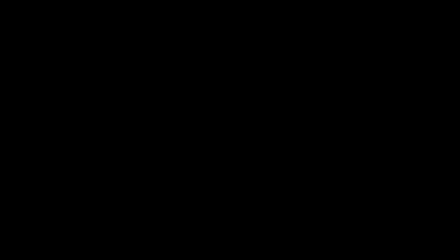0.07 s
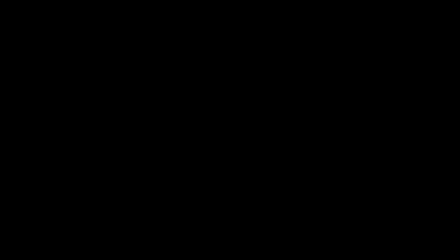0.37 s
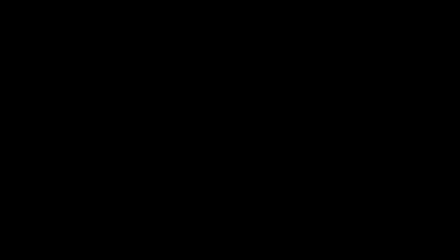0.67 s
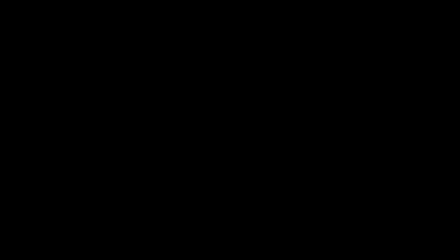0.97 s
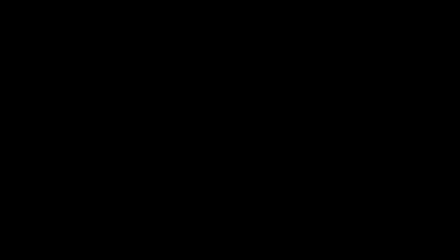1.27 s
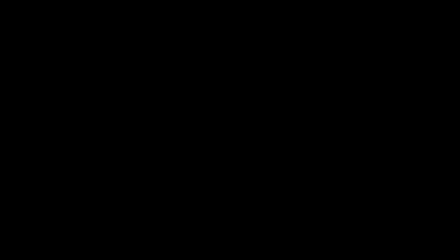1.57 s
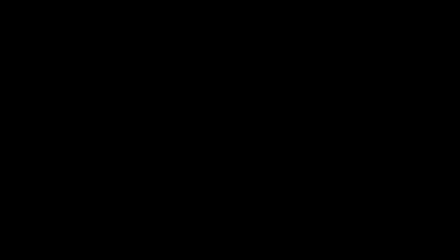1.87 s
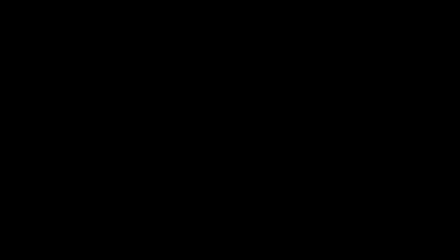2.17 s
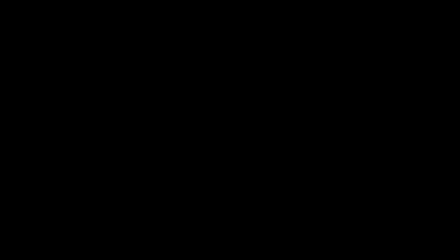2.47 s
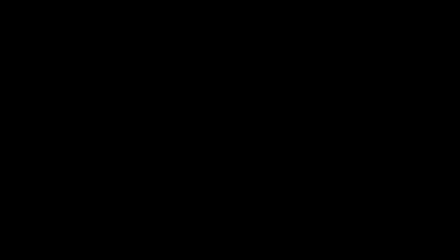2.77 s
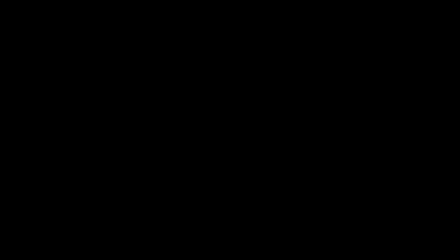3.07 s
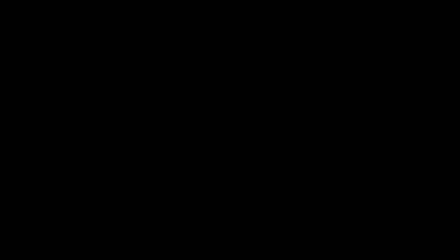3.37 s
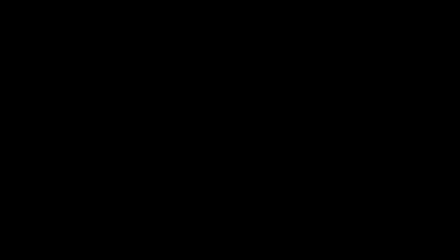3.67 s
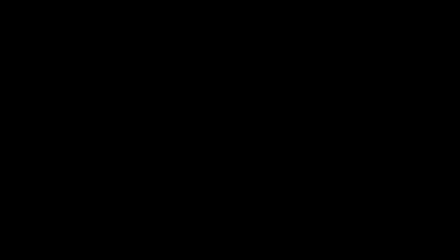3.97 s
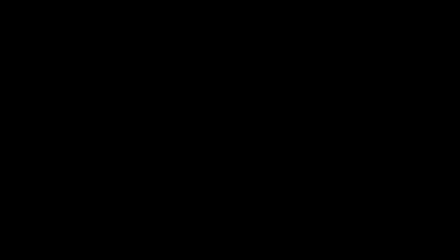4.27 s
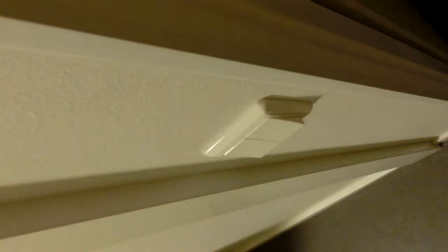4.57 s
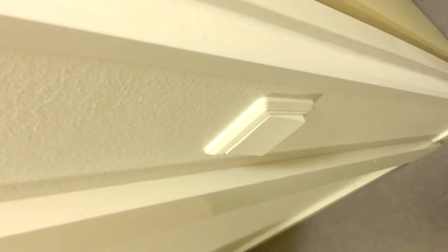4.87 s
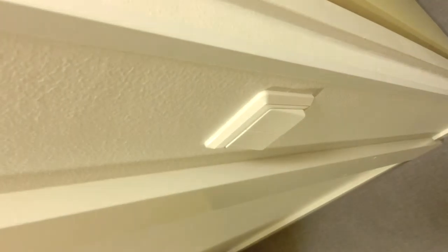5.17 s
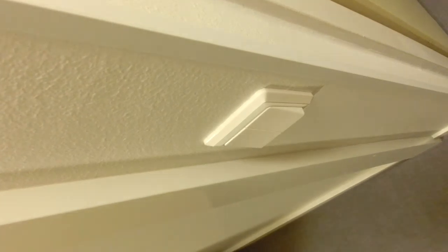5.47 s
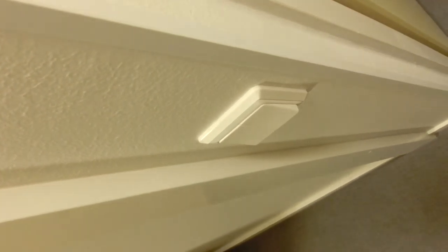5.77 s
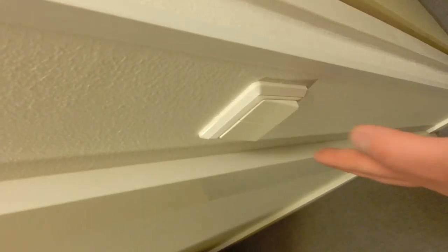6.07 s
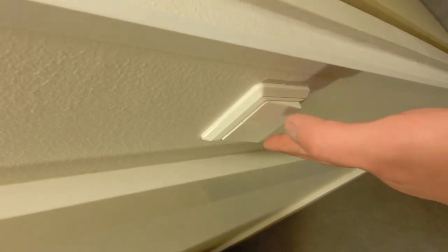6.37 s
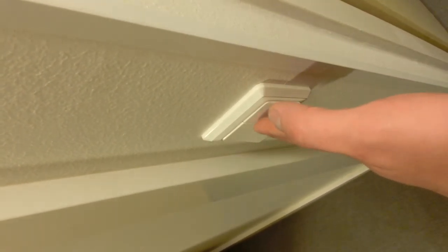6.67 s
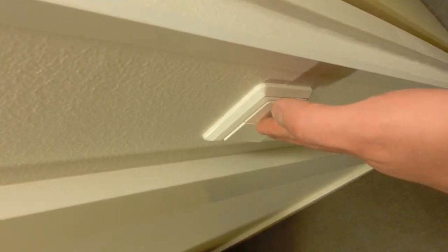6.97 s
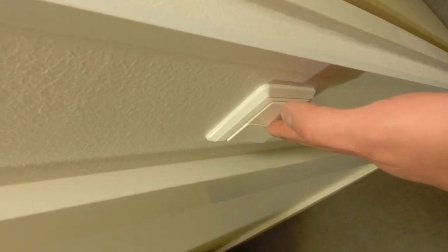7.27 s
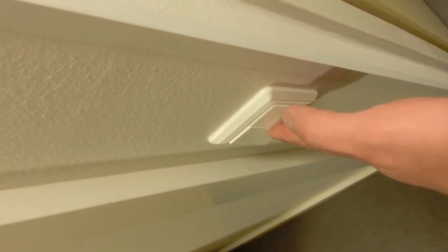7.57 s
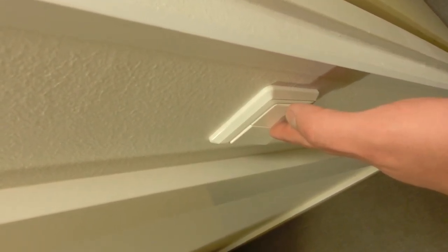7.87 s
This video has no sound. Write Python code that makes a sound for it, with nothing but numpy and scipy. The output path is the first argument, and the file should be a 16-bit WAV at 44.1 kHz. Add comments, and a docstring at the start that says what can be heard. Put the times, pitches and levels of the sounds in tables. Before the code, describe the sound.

A single crisp snap of a light switch, very close to the microphone, stands out in a small room with a short echo. Before it there is only low house rumble, steady hiss and a light tick of a finger on the switch. After it the background drops and creeps back up, while cloth and skin brush faintly. A barely audible high whine comes and goes.

```python
"""Low hum, house rumble and microphone hiss in a small quiet room, with a few dry ticks and the soft
friction of skin and sleeve. A finger takes up a wall switch's slack; a faint electronic whine comes and
goes. At 3.5 s the switch flips close to the microphones: the rocker lets go and lands 2.5 ms later,
the contacts bounce, and wall and room ring on. The click pushes the recorder's gain down,
and the hiss creeps back over three seconds."""
import sys
import numpy as np
from scipy import signal
from scipy.fft import rfft, irfft
from scipy.io import wavfile
from scipy.ndimage import minimum_filter1d

SR = 44100
rng = np.random.default_rng(int(sys.argv[2]) if len(sys.argv) > 2 else 0)


def store_pcm(level_fs):
    """Save levels as 16-bit WAV."""
    pcm = np.round(np.clip(level_fs, -1, 1) * 32767).astype(np.int16)
    wavfile.write(sys.argv[1], SR, np.atleast_2d(pcm).T)


N = 357651
TIME = np.arange(N) / SR
RELEASE_S, LANDING_S = 3.5112, 3.5137


def from_db(db):
    """Decibels to gain."""
    return 10 ** (np.asarray(db) / 20)


def at_hz(points, hz, column=1):
    """Read one column of a table on a log-frequency axis."""
    points = np.array(points)
    return np.interp(np.log(hz + 1e-9), np.log(points[:, 0]), points[:, column])


def pan(left_db):
    """Gains of the two microphones for a left-minus-right level."""
    return from_db(np.array([[left_db], [-left_db]]) / 2)


def impulses(blows):
    """One impulse for each (time [s], level [dB])."""
    out = np.full(N, 1e-18)
    for s, db in blows:
        out[round(s * SR)] += from_db(db)
    return out


def resonate(x, hz, width_hz):
    """A resonance passed twice, so that it swells briefly before it dies; gain 1 at its peak."""
    r = np.exp(-np.pi * width_hz / SR)
    gain = (1 - r * r) / 2
    section = [gain, 0, -gain, 1, -2 * r * np.cos(2 * np.pi * hz / SR), r * r]
    return signal.sosfilt([section, section], x)


def strike(blows, modes):
    """Blows ring parallel resonances of alternating sign."""
    force = impulses(blows)
    return sum((-1) ** k * from_db(db) * resonate(force, hz, width)
               for k, (hz, width, db) in enumerate(modes))


def noise(spectrum):
    """Steady noise with the given spectral density."""
    gain = from_db(at_hz(spectrum, np.fft.rfftfreq(N, 1 / SR))) * np.sqrt(SR / 2)
    return irfft(rfft(rng.standard_normal(N)) * gain, N)


def stroke(start_s, length_s, resonances, rise_share, treble_fade=.32):
    """Friction noise in a few resonances; it swells quickly and fades more slowly, the treble first."""
    rise_s = length_s * rise_share
    past_peak = TIME - start_s - rise_s
    lowest_hz, out = resonances[0][0], 0
    for hz, width, db in resonances:
        fall_s = (length_s - rise_s) * (lowest_hz / hz) ** treble_fade
        swell = np.exp(-(past_peak / np.where(past_peak < 0, rise_s, fall_s)) ** 2)
        friction = resonate(rng.standard_normal(N), hz, width)
        out = out + from_db(db) * swell * friction / friction.std()
    return out


def house_hum(waver_hz=.6):
    """A distant motor hums, slightly unsteady, over the low rumble of the house."""
    # rumble of the house: (frequency [Hz], density [dB per Hz])
    rumble = [(15, -85), (35, -87.5), (62, -83.5), (95, -91.5), (150, -90), (300, -93.5), (540, -93.5),
              (740, -98.5), (1000, -103), (1400, -112), (2400, -112), (4500, -128)]
    # tones of the motor: (frequency [Hz], level [dB])
    hum = [(49.1, -63.5), (733, -81.5), (1060, -87.5)]
    out = noise(rumble)
    for hz, db in hum:
        waver = np.interp(TIME, np.linspace(0, TIME[-1], 40), rng.normal(0, waver_hz, 40))
        out = out + from_db(db) * np.sqrt(2) * np.sin(2 * np.pi * np.cumsum(hz + waver) / SR)
    return out


def microphone_hiss():
    """Each microphone of the pair adds its own steady noise."""
    # noise floor: (frequency [Hz], density [dB per Hz])
    hiss = [(12, -76.5), (30, -87), (120, -87.5), (250, -91.5), (500, -96), (1000, -100), (2000, -103),
            (4000, -105.5), (8000, -107), (14300, -107), (15600, -111)]
    return np.array([noise(hiss), noise(hiss)])


def skin_squeaks():
    """Skin squeaks faintly as the grip shifts."""
    # shifts of the grip: (time [s], length [s], pitch [Hz], level [dB])
    squeaks = [(0.373, 0.013, 2850, -68.5), (1.08, .15, 2480, -76), (1.42, .09, 2660, -75.5),
               (4.781, .14, 2760, -60)]
    # partials and the friction under them: (frequency [multiple of pitch], width [Hz], level [dB])
    skin = [(1, 330, 0.5), (3.38, 1200, -3.5), (2.3, 9500, -6)]
    out = 0
    for s, length, hz, db in squeaks:
        partials = [(hz * multiple, width, partial_db) for multiple, width, partial_db in skin]
        out = out + from_db(db) * stroke(s, length, partials, rise_share=.11)
    return out


def casing_ticks():
    """Tiny dry ticks ring the casing, right at the microphone."""
    # ticks: (time [s], level [dB])
    ticks = [(.414, -24), (3.957, -34), (5.397, -25), (7.232, -28.5)]
    # resonances of the casing: (frequency [Hz], width [Hz], level [dB])
    casing = [(7200, 1500, -4.5), (9200, 1500, -10), (11200, 1160, 1.5), (13500, 2500, -12)]
    return strike(ticks, casing)


def finger_touch():
    """A finger takes up the slack of the rocker with a light double tick."""
    # taps: (time [s], level [dB])
    touches = [(1.2961, -10.5), (1.29752, -11)]
    # resonances of the slack rocker: (frequency [Hz], width [Hz], level [dB])
    slack = [(850, 360, -8.5), (2550, 250, -13), (3700, 420, -1), (4454, 220, 1.5), (5050, 780, -5),
             (7160, 300, -0.5), (8630, 280, -0.5), (10220, 450, 3.5), (12200, 400, -11), (14400, 900, -12)]
    return strike(touches, slack)


def whine(pulse_hz=7900, pulse_db=-75, every_s=.066, pulse_s=.03, edge_s=.008):
    """Faint high tones of the electronics switch on and off, held or pulsing."""
    # held tones: (time [s], length [s], frequency [Hz], level [dB])
    whines = [(2.10, .34, 7430, -83), (4.54, .27, 7430, -81), (5.549, .69, 7424, -83),
              (6.369, .27, 7572, -75)]
    # spells of steady pulsing: (time [s], length [s])
    pulsings = [(2.535, .56), (3.195, .1), (3.395, .035)]
    gate = lambda age, length: np.clip(np.minimum(age, length - age) / edge_s, 0, 1)
    tone = lambda hz, db: from_db(db) * np.sqrt(2) * np.sin(2 * np.pi * hz * TIME)
    held = sum(gate(TIME - s, length) * tone(hz, db) for s, length, hz, db in whines)
    pulses = sum(gate(TIME - s, length) * gate((TIME - s) % every_s, pulse_s) for s, length in pulsings)
    return held + pulses * tone(pulse_hz, pulse_db)


def disperse(x, stiffness=.45, stages=10):
    """In a stiff plate high bending waves run ahead of low ones, which smears each blow."""
    allpass = [-stiffness, 1, 0, 1, -stiffness, 0]
    return signal.sosfilt([allpass] * stages, x)


def rocker(creep_s=.0028, creep_db=-46, thud_db=9.5, thud_hz=170):
    """The rocker creeps, snaps over its spring and lands; each blow rings the plate in its own way."""
    # rocker and cover plate: (frequency [Hz], width [Hz], release level [dB], landing level [dB])
    plate = [(409.6, 170, 7.5, 19.5), (620, 300, 10, 13.5), (904, 400, 7, 19.5), (1250, 400, -4, 5.5),
             (1740, 600, 4.5, 7), (2570, 460, 25, 19.5), (3460, 350, 18.5, 15.5), (3950, 500, 10, 22.5),
             (4700, 650, 22, 23), (5682, 750, 27, 27), (6650, 800, 24, 28), (7630, 600, 17, 16),
             (8230, 600, 20.5, 15), (9120, 650, 23, 33.5), (9850, 650, 26, 15.5), (10950, 700, 22.5, 25.5),
             (11700, 700, 28.5, 13), (12400, 490, 16, 24.5), (12850, 600, 27.5, 19.5),
             (13800, 700, 14, 17.5), (14650, 670, 21, 23)]
    release_modes = [(hz, width, db) for hz, width, db, _ in plate]
    landing_modes = [(hz, width, db) for hz, width, _, db in plate]
    release = strike([(RELEASE_S - creep_s, creep_db), (RELEASE_S, 0)], release_modes)
    landing = strike([(LANDING_S, 0)], landing_modes)
    lowpass = signal.butter(2, thud_hz, fs=SR, output="sos")
    thud = signal.sosfilt(lowpass, impulses([(RELEASE_S, thud_db)]))
    return disperse(release) + thud, disperse(landing)


def contact_chatter(blow_db=-8.0, fall_s=.0022, low_hz=1500):
    """The contacts bounce after each blow: a dense bright crackle, different at each microphone."""
    blows = impulses([(RELEASE_S, blow_db), (LANDING_S, blow_db)])
    envelope = signal.lfilter([1], [1, -np.exp(-1 / (fall_s * SR))], blows)
    highpass = signal.butter(2, low_hz, "high", fs=SR, output="sos")
    return signal.sosfilt(highpass, envelope * rng.standard_normal((2, N)))


def wall_ring():
    """The landing leaves the hollow wall and the spring ringing."""
    # their long rings: (frequency [Hz], level [dB], time to fall 60 dB [s])
    rings = [(415, -30, .5), (610, -35, 0.39), (745, -35, .3), (926, -35.5, .35), (1188, -38, 0.73),
             (1326, -38, .4), (2361, -40, .6), (2512, -32.5, .35), (2705, -32, .25), (3289, -39, .3),
             (5900, -27, .13), (6540, -33, .3), (9000, -28.5, 0.21), (8983, -28, .19), (9300, -24.5, .1),
             (11040, -30, .1), (12229, -29, .13)]
    age = np.maximum(TIME - LANDING_S, 0)
    return sum(from_db(db - 60 * age / t60) * np.sin(2 * np.pi * hz * age) for hz, db, t60 in rings)


def sleeve_swishes():
    """A sleeve swishes past, each move one stroke of bright friction."""
    # moves of the sleeve: (time [s], length [s], level [dB])
    swishes = [(4.311, .12, -74), (4.606, .115, -63)]
    # noise bands of the cloth: (frequency [Hz], width [Hz], level [dB])
    cloth = [(3850, 4200, -1), (12800, 7000, -2)]
    return sum(from_db(db) * stroke(s, length, cloth, rise_share=.39) for s, length, db in swishes)


def hand_rub():
    """The hand rubs dully as it reaches out."""
    # move of the hand: (time [s], length [s], level [dB])
    rubs = [(6.172, .13, -64)]
    # the palm's soft bump and its friction: (frequency [Hz], width [Hz], level [dB])
    palm = [(377, 240, -2), (1800, 1600, -0.5)]
    return sum(from_db(db) * stroke(s, length, palm, rise_share=.13) for s, length, db in rubs)


def room_echo(x, early_db=5.0, early_t60=.089, gap_s=.003):
    """Dense early reflections off the near walls, then a tail that dies faster in the treble."""
    # the small room: (frequency [Hz], level [dB], time to fall 60 dB [s], left-right likeness [0-1])
    room = [(100, -5.5, .4, .8), (380, -1.5, .55, .97), (650, 1.5, 0.52, 1), (1120, 2.5, 0.57, 0.95),
            (1800, -5, .55, 0.9), (2600, -9, .52, .9), (4000, -11.5, 0.51, .75), (6200, -17, 0.45, 0.61),
            (8000, -15.5, 0.4, 0.5), (9500, -17, 0.38, 0.7), (12000, -16.5, .29, .1),
            (15500, -16, .25, 0.0075)]
    t, response = TIME[:SR], 0
    edges_hz = np.geomspace(70, 17000, 25)
    for low, high in zip(edges_hz, edges_hz[1:]):
        hz = np.sqrt(low * high)
        band = signal.butter(2, [low, high], "band", fs=SR, output="sos")
        mid, side = signal.sosfilt(band, rng.standard_normal((2, 2 * SR)))[:, SR:]
        db, t60, alike = (at_hz(room, hz, column) for column in (1, 2, 3))
        fade = from_db(-60 * t / t60) + from_db(early_db - 60 * t / early_t60)
        onset = np.clip(t / gap_s - 1, 0, 1)
        pair = (np.sqrt(1 + alike) * mid + np.sqrt(1 - alike) * side * [[1], [-1]]) * fade * onset
        share = (high - low) / (SR / 2)  # a band carries energy in proportion to its width
        response = response + from_db(db) * np.sqrt(2 * share) * pair / np.linalg.norm(pair)
    return signal.fftconvolve(x[None], response, axes=1)[:, :N]


def gain_control(x, threshold_db=-9.0, range_db=10.5, recover_db_per_s=3.5):
    """A loud peak turns the recorder's gain down at once; it comes back slowly."""
    peak = -minimum_filter1d(-np.abs(x).max(axis=0), size=89)  # highest within 2 ms
    over_db = np.clip(20 * np.log10(peak + 1e-9) - threshold_db, 0, range_db)
    recovery_db = recover_db_per_s * TIME
    cut_db = np.maximum.accumulate(over_db + recovery_db) - recovery_db
    return x * from_db(-cut_db)


def scene():
    """Switch and hand close by, a little right of centre, over the room tone."""
    release, landing = rocker()
    crackle, touch = contact_chatter(), finger_touch()
    brushes = sleeve_swishes() + hand_rub() + skin_squeaks()
    blows = release * pan(left_db=-4.5) + landing * pan(left_db=-3.0)
    click = from_db(1.0) * blows + from_db(-3.5) * crackle * pan(left_db=-2.0)
    soft_sounds = from_db(-3.5) * wall_ring() + touch + brushes
    # under the finger, mostly the middle band of the light touch spreads into the room
    shaded_touch = resonate(touch, hz=4900, width_hz=4000)
    echo = room_echo(release + landing + crackle[0] + from_db(10) * shaded_touch + from_db(3) * brushes)
    hiss = microphone_hiss() * pan(left_db=-.75)
    background = house_hum() + whine() + from_db(-1.0) * casing_ticks()
    return click + hiss + (soft_sounds + echo + background) * pan(left_db=-2.5)


def record(dry, open_s=.125, ceiling=.7, cutoff_hz=15800):
    """The recorder's input opens after a moment; gain control, flattened peaks and a steep top cut."""
    opened = np.clip((TIME - open_s) / .006, 0, 1)
    limited = np.clip(gain_control(dry * opened), -ceiling, ceiling)
    return signal.sosfilt(signal.ellip(12, .1, 110, cutoff_hz, fs=SR, output="sos"), limited)


dry = scene()
out = record(dry)
store_pcm(out)
```